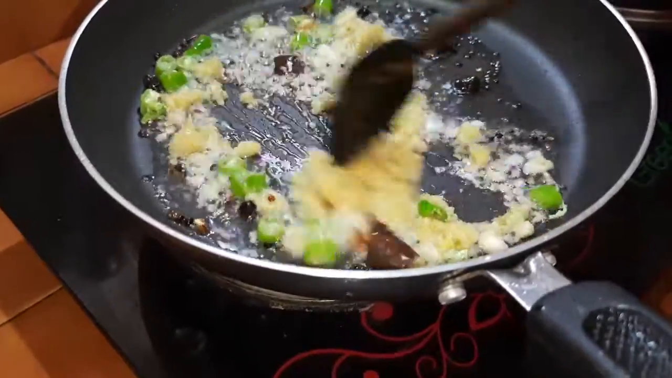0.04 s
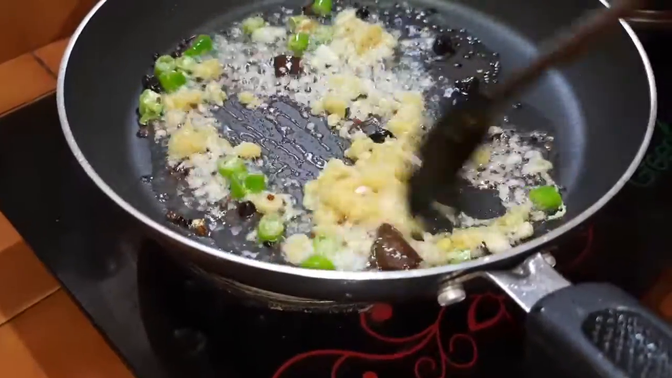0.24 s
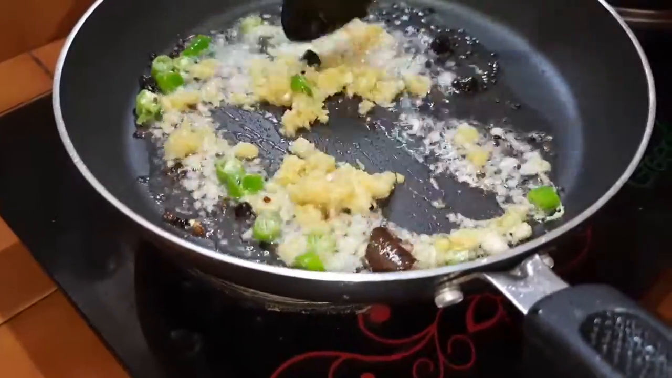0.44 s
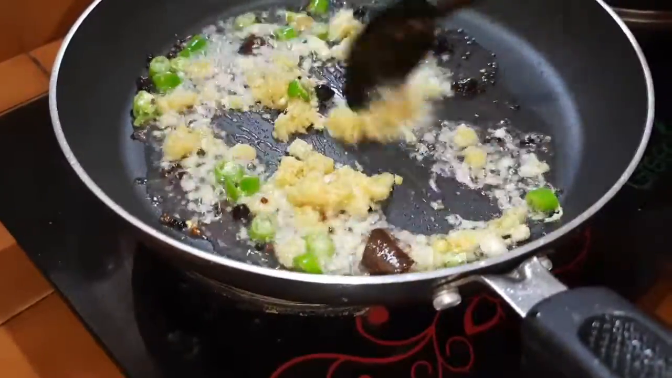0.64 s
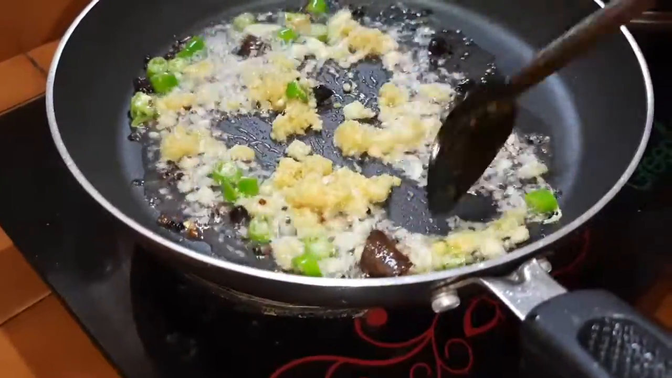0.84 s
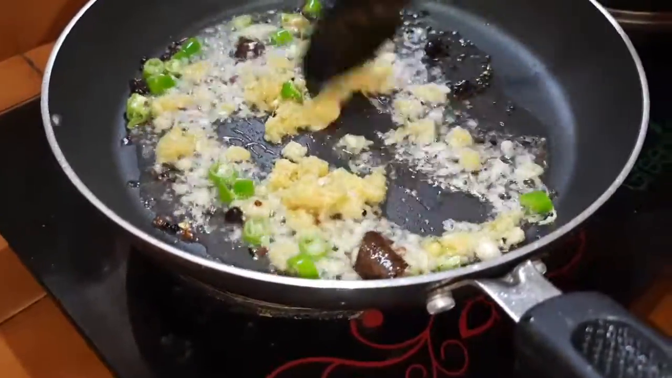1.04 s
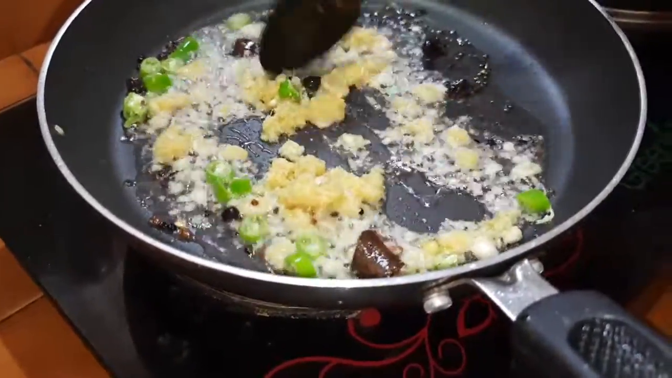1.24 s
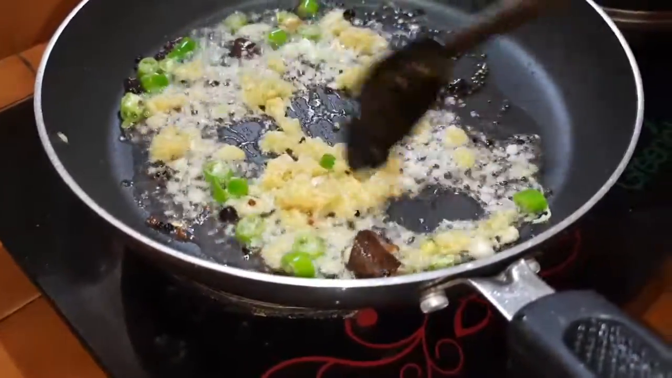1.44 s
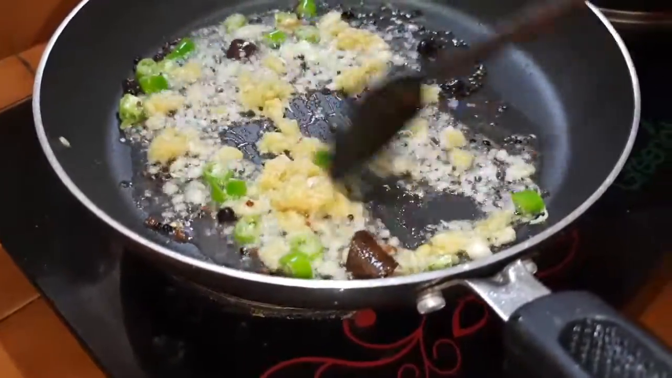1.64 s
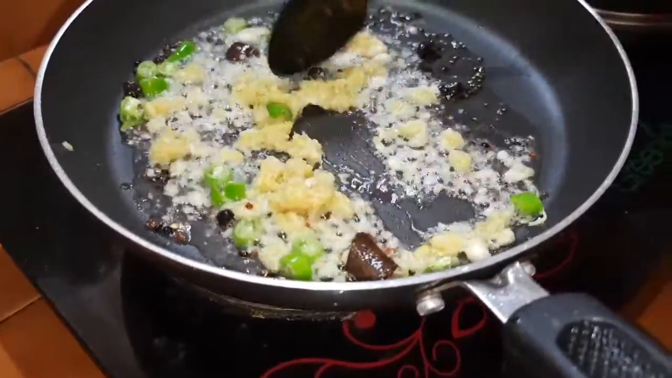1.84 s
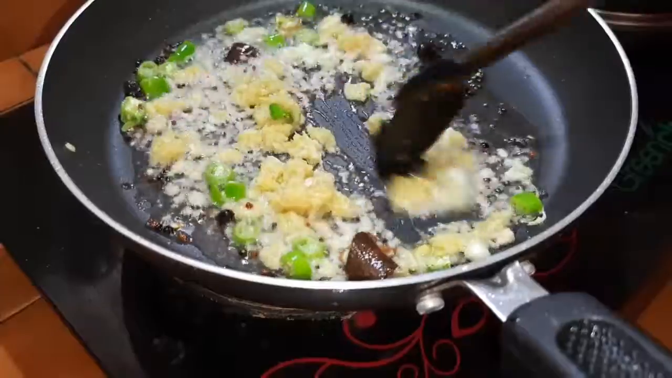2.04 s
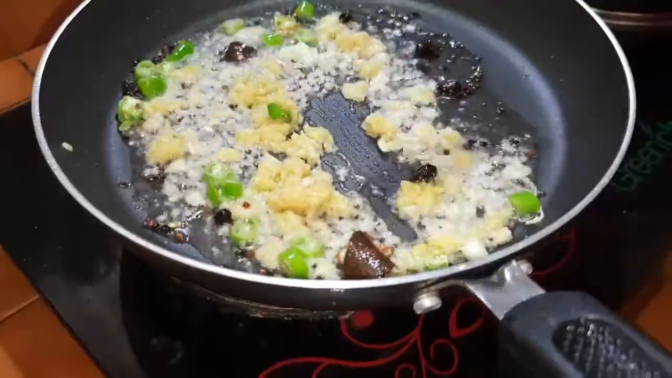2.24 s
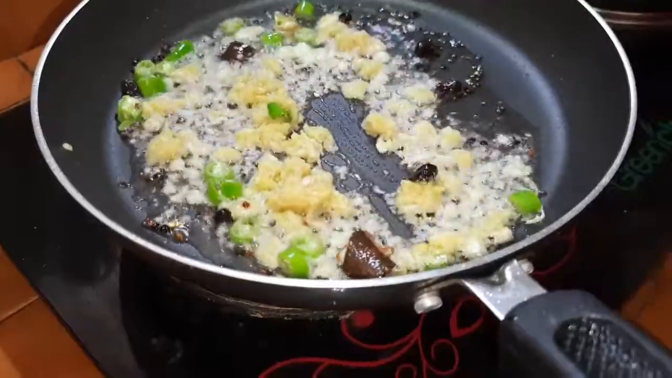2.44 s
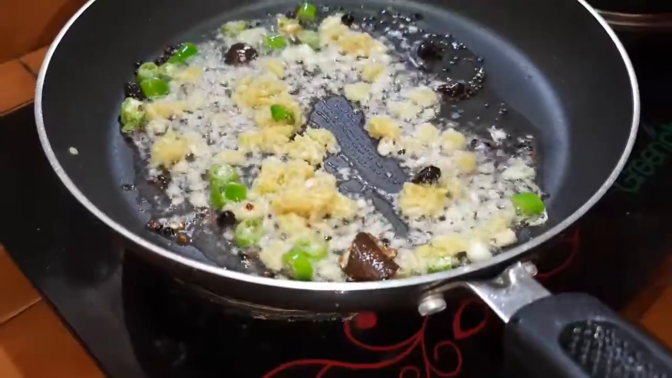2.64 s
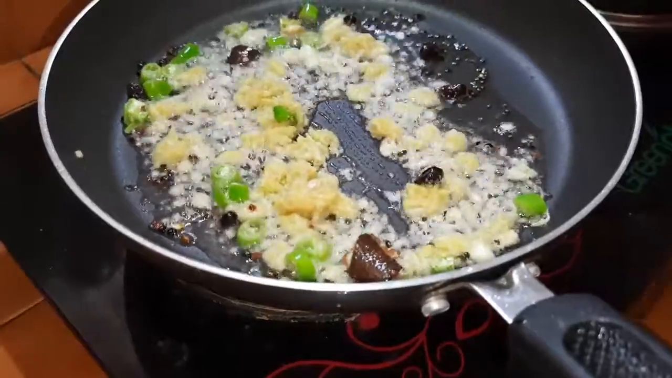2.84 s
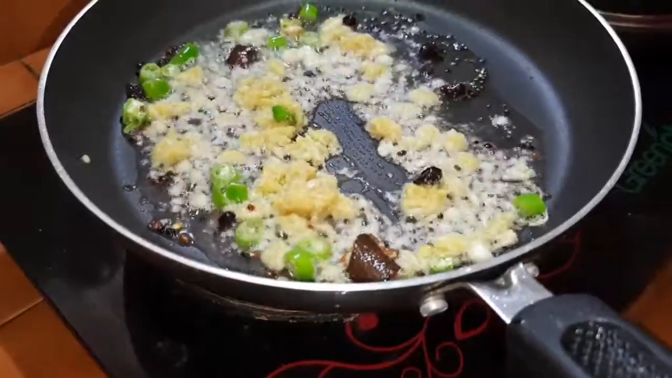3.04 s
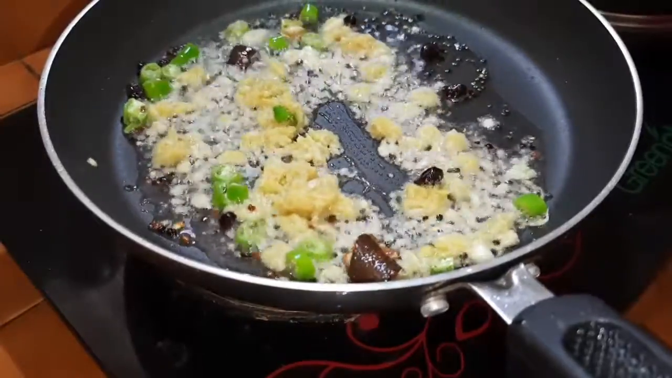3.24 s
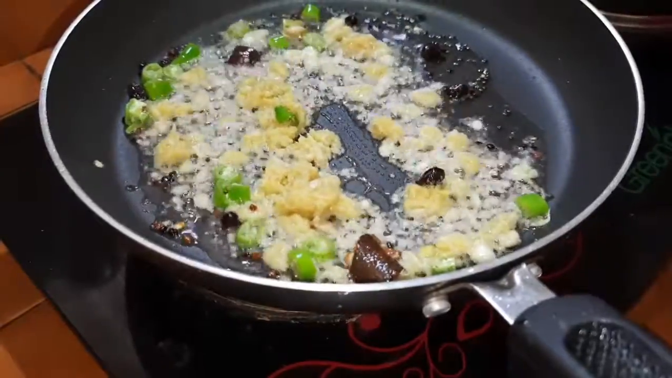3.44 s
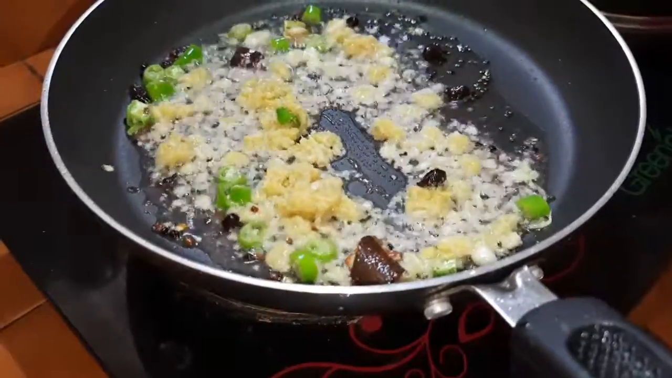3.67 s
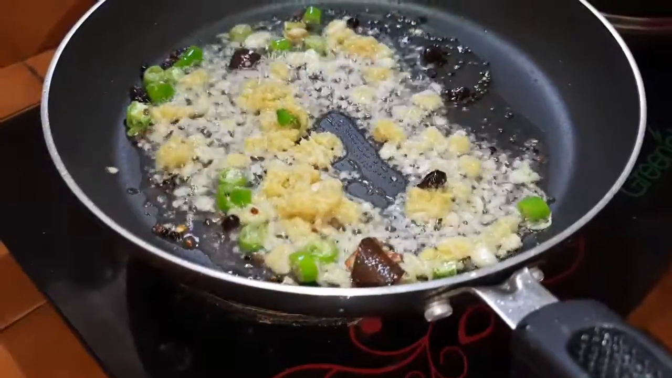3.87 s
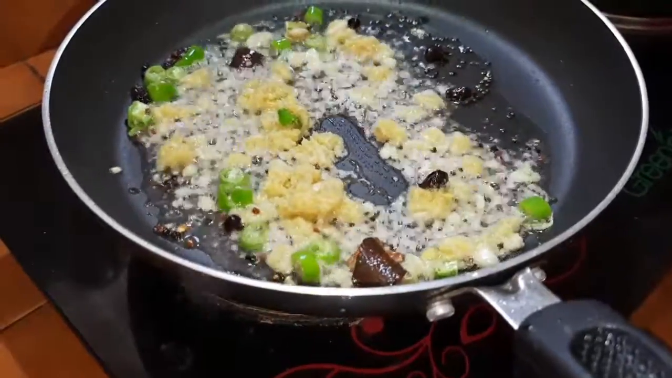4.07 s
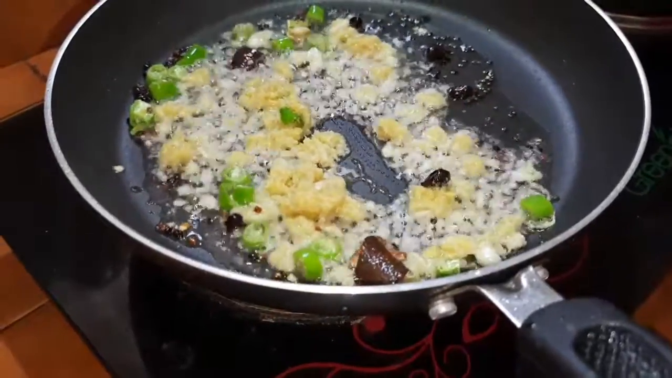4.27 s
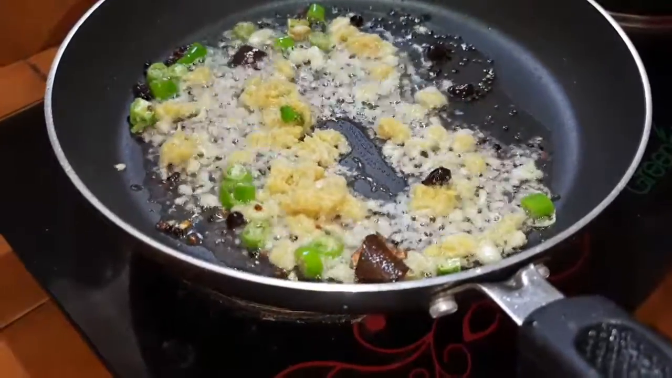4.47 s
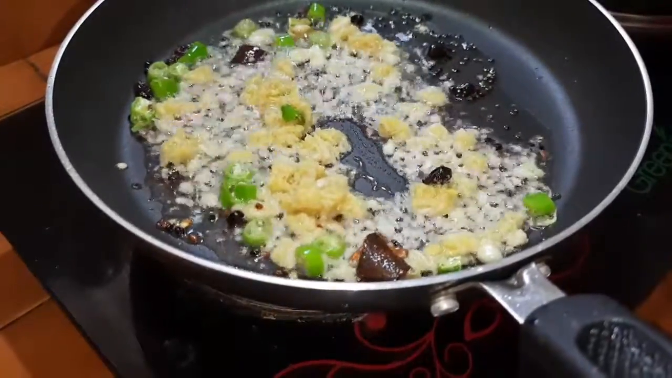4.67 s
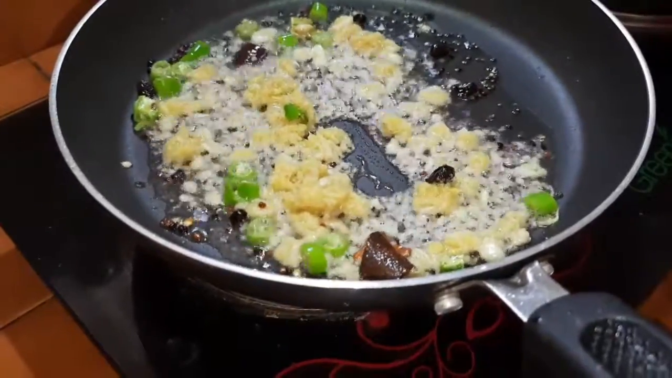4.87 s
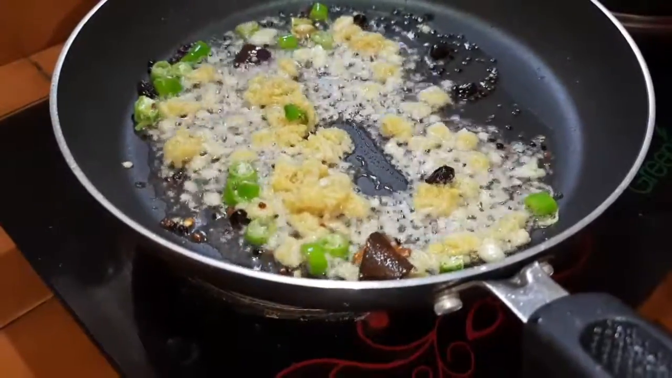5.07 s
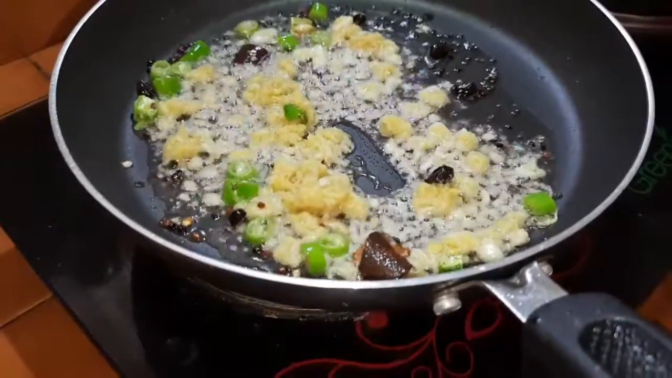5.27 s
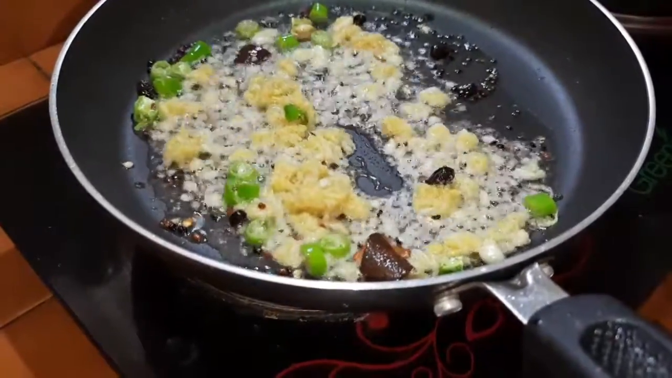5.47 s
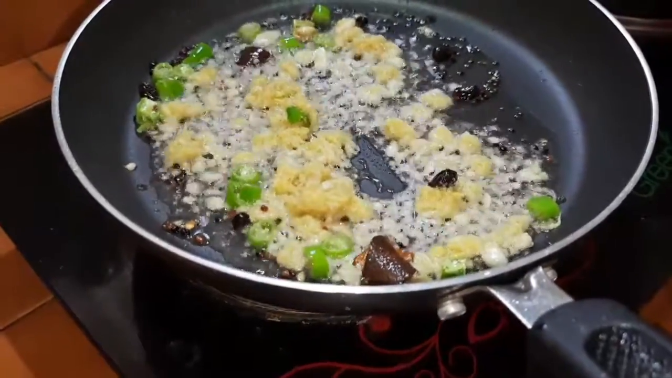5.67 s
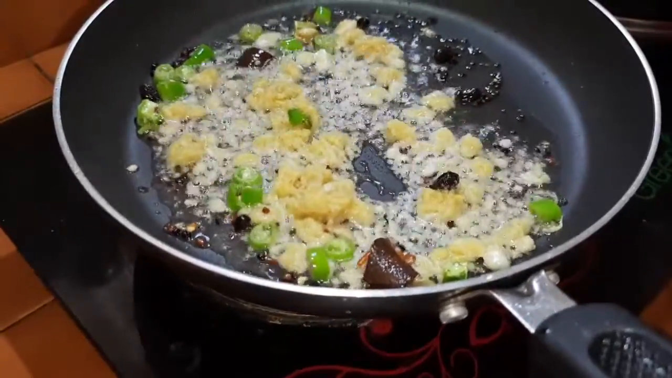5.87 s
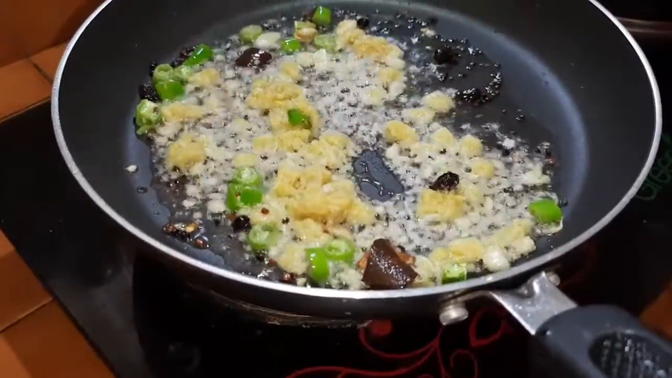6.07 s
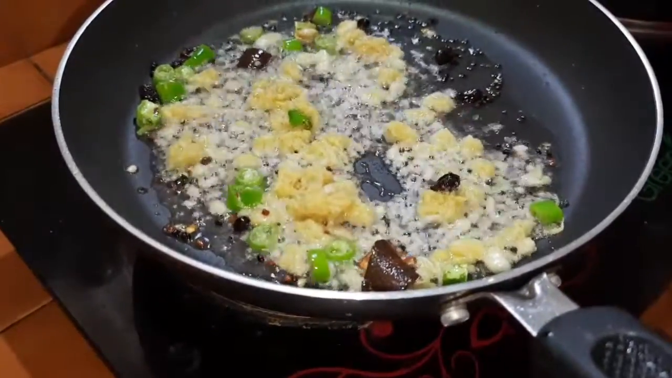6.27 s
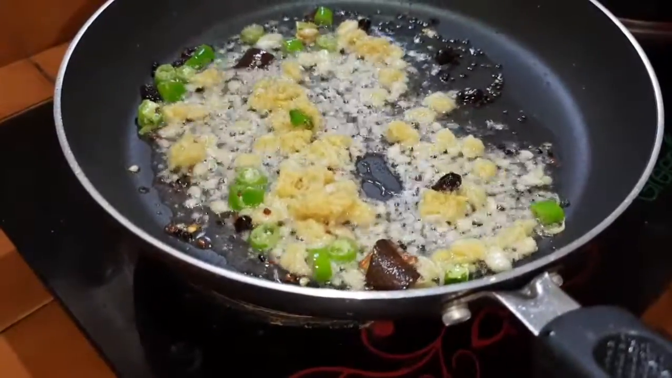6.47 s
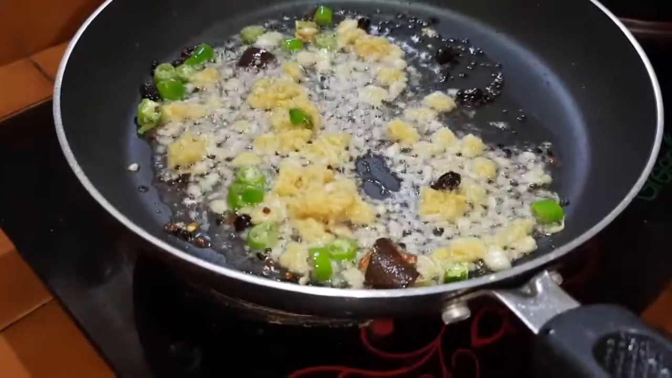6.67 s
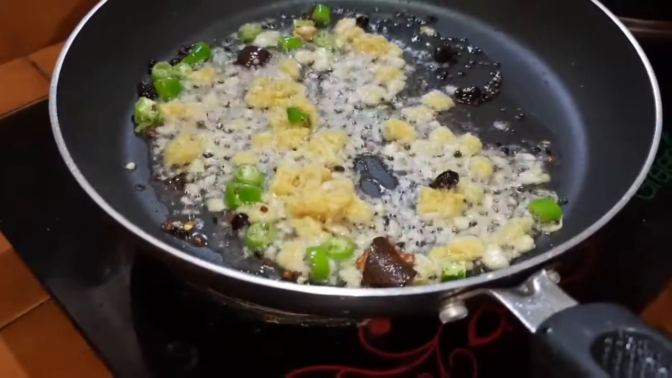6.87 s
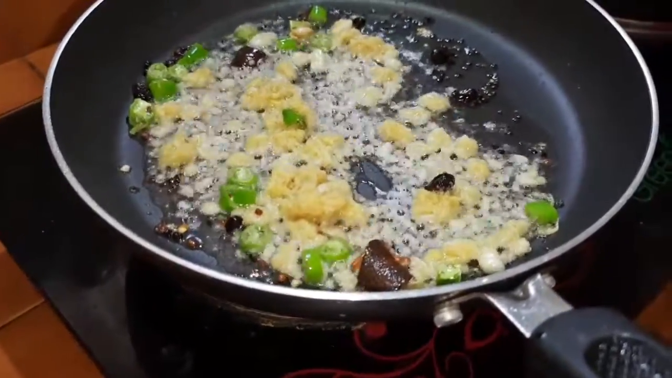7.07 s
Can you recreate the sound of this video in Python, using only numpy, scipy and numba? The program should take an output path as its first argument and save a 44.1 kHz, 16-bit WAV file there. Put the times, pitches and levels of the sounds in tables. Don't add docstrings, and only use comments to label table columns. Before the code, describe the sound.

Close, bright sizzle of ginger and spices in hot oil, snapping and popping, with four spatula taps and scrapes, then a rattling set-down.

```python
import sys
import numpy as np
from scipy import signal
from scipy.fft import rfft, irfft
from scipy.io import wavfile
from scipy.ndimage import uniform_filter1d
from numba import njit

SR = 44100
rng = np.random.default_rng(int(sys.argv[2]) if len(sys.argv) > 2 else 0)


def inscribe(sig):
    pcm = np.round(np.clip(np.atleast_2d(sig).T, -1, 1) * 32767)
    wavfile.write(sys.argv[1], SR, pcm.astype(np.int16))


def attenuation_scalar(level_db):
    decades = np.asarray(level_db, float) / 20
    return 10 ** decades


N = 313551


def level(x, db):
    return x * attenuation_scalar(db) / np.sqrt(np.mean(x ** 2))


def colour(x, points=((1, 0),), peaks=()):
    hz = np.maximum(np.arange(2049) * SR / 4096, 1)
    point_hz, point_db = np.array(points).T
    db = np.interp(np.log(hz), np.log(point_hz), point_db)
    db = db + sum(g * np.exp(-2 * ((hz - f) / w) ** 2) for f, w, g in peaks)
    cepstrum = irfft(np.log(attenuation_scalar(db)))
    causal = np.r_[cepstrum[0], 2 * cepstrum[1:2048], np.zeros(2048)]
    impulse = irfft(np.exp(rfft(causal)))
    return signal.fftconvolve(np.atleast_2d(x), impulse[None], axes=1)[:, :N]


def ring(x, hz, width):
    return signal.lfilter(*signal.iirpeak(hz, hz / width, fs=SR), x)


def walk(rate, count):
    k = max(int(1000 / rate), 1)
    held = np.repeat(rng.standard_normal((count, 7200 // k + 1)), k, axis=1)
    return 1.3 * uniform_filter1d(uniform_filter1d(held, k), k)[:, :7200]


def swells(s, rise, hold, fade):
    t = np.arange(0, N, 8) / SR
    rows = []
    for start, r, h, f in np.broadcast(s, rise, hold, fade):
        corners = np.cumsum([start, r, h, 60 / f])
        rows.append(np.interp(t, corners, [-10.5, 0, 0, -60], -200, -200))
    return np.repeat(attenuation_scalar(np.array(rows)), 8, axis=1)[:, :N]


def strokes(rows, rise, hold):
    s, db, bright_db, fade = np.transpose(rows)
    return [attenuation_scalar(db + k * bright_db) @ swells(s, rise[k], hold, fade) for k in range(2)]


def chatter(rate, scatter_db):
    u = rng.random((2, N))
    size = (1 - u[1]) ** (-scatter_db / 8.7)
    sign = np.sign(u[1] * 97 % 1 - .5)
    return (u[0] < rate / SR) * size * sign


def steady(x, span_s):
    power = uniform_filter1d(x ** 2, max(int(span_s * SR), 1))
    return x / np.sqrt(power + 0.28 * np.mean(x ** 2))


@njit
def bursts(at, hz, cycles, size, rise, glide, n):
    out = np.zeros(n + 4000)
    for k in range(len(at)):
        w = 2 * np.pi * hz[k] / SR
        span = cycles[k] * SR / hz[k]
        i = int(at[k])
        late = i + 1 - at[k]
        z = size[k] * np.exp((1j * w - 1 / span) * late)
        step = np.exp(1j * w - 1 / span)
        turn = np.exp(1j * w * glide / span)
        shut, fast = np.exp(-late / (rise * span)), np.exp(-1 / (rise * span))
        for j in range(min(int(4 * span) + 2, 3900)):
            out[i + 1 + j] += z.imag * (1 - shut)
            z, step, shut = z * step, step * turn, shut * fast
    return out[:n]


def two_ports(s, hz, cycles, size, lag_s, pan_db, rise, glide):
    ports = []
    for side in (.5, -.5):
        at = np.clip((s + side * lag_s) * SR, 0, N)
        ports.append(bursts(at, hz, cycles, size * attenuation_scalar(side * pan_db), rise, glide, N))
    return np.array(ports)


# (frequency [Hz], level [dB])
HUM_SPECTRUM = [(25, -16), (45, -1.5), (65, -1.5), (115, -1), (170, -4), (260, -3), (400, -2.5), (800, -11),
                (2000, -20.5)]


def kitchen():
    both, left, right = colour(rng.standard_normal((3, N)), HUM_SPECTRUM)
    drift = np.interp(np.arange(N) / SR, np.arange(7200) / 1000, walk(7.7, count=1)[0])
    near = colour(left, [(30, 5.2), (70, 6.9), (200, 4.5), (500, 2.5)])[0]
    hum = np.array([near + 0.99 * both, 0.79 * right + 0.48 * both])
    return level(hum, -53.29) * attenuation_scalar(0.41 * drift)


def room(x, t60, db):
    t = np.arange(SR // 2) / SR
    tail = rng.standard_normal((2, len(t))) * 1000 ** (-t / t60) * (t > .003)
    return signal.fftconvolve(x, attenuation_scalar(db) * tail / np.sqrt(np.sum(tail[0] ** 2)), axes=1)[:, :N]


# (time [s], hold [s], level near 145 Hz [dB], near 240 Hz [dB], near 400 Hz [dB])
HOB_JOLTS = [
    (.99, 0.03, -43, -38, -44),
    (1.367, .02, -52, -68, -64),
    (1.678, .03, -42.5, -54, -47),
    (1.95, 0.02, -39.5, -51, -50),
    (3.273, 0.075, -42, -35, -45),
    (3.508, .01, -41.5, -43, -48),
    (3.67, 0.089, -67, -60, -46.5),
]
# (frequency [Hz], width [Hz])
GLASS_MODES = [(143, 25), (240, 33), (390, 130)]


def hob():
    s, hold, *modes_db = np.transpose(HOB_JOLTS)
    gains = attenuation_scalar(np.array(modes_db)) @ swells(s, 0.024, hold, 226)
    shudder = 0
    for gain, (hz, width) in zip(gains, GLASS_MODES):
        mode = ring(ring(chatter(2500, scatter_db=2.0), hz, width), hz, 2 * width)
        shudder = shudder + steady(mode, 0.71 / width) * gain
    return shudder


# (time [s], level [dB], brightness [dB], fade [dB/s])
LAYING_DOWN = [
    (3.281, -25.5, 6, 178),
    (3.469, -34, -3, 126),
]
# (frequency [Hz], width [Hz], level [dB])
SPATULA_LOW = [(1217, 48, 3), (1310, 55, 3), (1460, 82, -7), (1580, 66, -3)]
# (frequency [Hz], width [Hz], level [dB])
SPATULA_HIGH = [(1760, 140, -2), (1940, 53, -1), (2120, 81, 5), (2340, 90, -8), (2420, 150, 5),
                (2600, 180, 0), (2940, 150, -21), (5050, 1400, -13)]


def rattle():
    clicks = chatter(2200, scatter_db=1.0)
    gains = strokes(LAYING_DOWN, rise=(0.053, 0.061), hold=0.029)
    sound = 0
    for modes, gain in zip((SPATULA_LOW, SPATULA_HIGH), gains):
        ringing = sum(attenuation_scalar(g) * ring(clicks, f, w) for f, w, g in modes)
        sound = sound + steady(ringing, 0.014) * gain
    return np.array([np.roll(sound, -5), sound])


# (frequency [Hz], level [dB], t60 [s])
PAN_MODES = [(534, -21, 0.28), (628, -3, 0.19), (664, -0.5, 0.13), (772, -4, 0.095), (865, -8, 0.18),
             (967, -2.5, 0.11), (1023, -1.5, 0.18), (1170, -4, 0.11), (1285, -6, 0.11), (1450, 2, 0.063),
             (1846, 3, 0.12), (1950, 3, 0.085), (2080, 2, 0.084), (2290, 2, 0.16), (2530, 4, 0.059),
             (2960, -22, .08)]
# (time [s], level [dB], brightness [dB], fade [dB/s])
BLADE_DRAG = [
    (.98, -28.5, 6.5, 350),
    (1.03, -36, 9.5, 148),
    (1.37, -33.5, -1, 68),
    (1.675, -26.5, 5, 250),
    (1.965, -28, -11, 126),
]


def drag():
    clicks = chatter(2200, scatter_db=1.0)
    gains = strokes(BLADE_DRAG, rise=(0.022, 0.0021), hold=0.0035)
    sound = 0
    for modes, gain in zip((PAN_MODES[:7], PAN_MODES[7:]), gains):
        ringing = sum(attenuation_scalar(g) * ring(clicks, f, 10.0 / t60) for f, g, t60 in modes)
        sound = sound + level(ringing, -2.7) * gain
    return np.array([sound, np.roll(sound, 4)])


# (time [s], peak level [dB], push [ms])
HOB_KNOCKS = [
    (1.037, -31.5, 5.),
    (1.1698, -17.5, 0.37),
    (3.317, -34, 2.9),
]


def thumps():
    t = np.arange(N) / SR
    return sum(attenuation_scalar(g) * np.sin(np.pi * np.clip((t - at) * 1000 / ms, 0, 1)) for at, g, ms in HOB_KNOCKS)


# (time [s], peak level [dB], knock [Hz],
# ring of the pan [dB], left minus right [dB])
SPATULA_TAPS = [(0.85, -28, 2320, -8, -4), (0.971, -8, 1000, -4, -2), (0.985, -18, 1000, -5, 7),
                (1.0308, -10.5, 1100, -15, -14), (1.0307, -11, 2480, -8, 8), (1.0313, -5, 5070, -9, -7),
                (1.047, -27, 2100, 3, -4), (1.26, -30, 2100, -9, 1), (1.3598, -14, 830, 4, 2),
                (1.6702, -18, 1310, 2, -6), (1.683, -25.5, 1900, -3, 0), (1.691, -23, 2210, -4, -7),
                (1.899, -27, 2700, -6, -4), (1.9508, -11.5, 676, 4, 0.5), (1.9510, -17, 1010, -4, 7)]
# (time [s], peak level [dB], knock [Hz], left minus right [dB])
SPATULA_BOUNCES = [
    (3.296, -15, 930, 2),
    (3.314, -13, 1570, 4),
    (3.3165, -19, 685, -3),
    (3.3345, -12, 2300, 3),
    (3.342, -19, 1620, -7),
    (3.353, -15, 2360, 0),
    (3.378, -21, 1260, -6),
]


def taps():
    bounces = [(at, g, f, -5.5, p) for at, g, f, p in SPATULA_BOUNCES]
    s, db, hz, ring_db, pan_db = np.transpose(list(SPATULA_TAPS) + bounces)
    contact_ms = np.repeat([0.71, 1.36], [len(SPATULA_TAPS), len(SPATULA_BOUNCES)])
    cycles = hz * contact_ms / 1000
    knock = two_ports(s, hz, cycles, attenuation_scalar(db + 2.0), 0 * s, pan_db, 0.69, -0.012)
    push = two_ports(s, hz, cycles, attenuation_scalar(db + 2.0 + ring_db), 0 * s, pan_db, 0.69, -0.012)
    ringing = sum(attenuation_scalar(g) * ring(push, f, 2.8 / t60) for f, g, t60 in PAN_MODES)
    no_bass = signal.butter(3, 380., "high", fs=SR, output="sos")
    return signal.sosfilt(no_bass, knock + attenuation_scalar(16.5) * ringing)


# (time [s], peak level [dB], left minus right [dB])
OIL_SPITS = [(0.277, -10, 11), (0.2921, -3, 9), (0.5641, -9, 6), (0.5766, -1, -2), (0.7283, -7, -1),
             (1.171, -8, 7), (1.227, -5, 3), (1.232, -6, 7), (2.3587, -3, 12), (2.3717, -7, 7),
             (2.581, -4, 1), (2.7254, -1, -1), (2.7827, -9, -1), (3.033, -11, 2), (3.8441, -10, 9),
             (3.952, -12, 7), (4.0469, -6, 4), (4.8562, -10, 7), (5.9199, -12, 8), (6.3689, -12, 10),
             (6.3858, -10, 3), (6.5448, -9, 0), (6.8776, -12, 0)]


def spits():
    s, db, pan_db = np.transpose(OIL_SPITS)
    lag = 0.064 * rng.standard_normal(len(s)) / 1000
    hz, cycles = np.full(len(s), 10700.0), np.full(len(s), 0.5)
    clicks = two_ports(s - .0001, hz, cycles, attenuation_scalar(db + 14.0), lag, pan_db - 1.0, 0.36, -.02)
    return colour(clicks, [(300, -27), (3000, -5.5)])


# (time [s], peak level [dB], pitch [Hz], left minus right [dB])
RINGING_BUBBLES = [(0.3122, -9, 6970, -1.5), (0.5594, -11, 6940, 3), (0.7274, -19, 6580, 0.0),
                   (1.2436, -9, 5940, -2.0), (1.5514, -19, 6520, 0.0), (1.619, -18, 3870, -1.5),
                   (2.5804, -16, 6730, 4), (2.6559, -16, 6870, -1.0), (2.7254, -18, 5190, -3),
                   (2.7815, -16, 4000, 0.0), (3.1374, -16, 4710, -4), (3.189, -11.5, 4080, 6),
                   (3.3774, -11, 5050, -0.5), (3.421, -11.5, 4060, 1), (3.613, -10, 4130, -2),
                   (3.6895, -11, 5620, 0.5), (3.9659, -18, 5270, -1.5), (5.9184, -26, 4680, -3),
                   (6.652, -13, 4750, -2), (6.972, -18.5, 4370, 3)]
# (time [s], peak level [dB], pitch [Hz], left minus right [dB])
LOW_BUBBLES = [
    (1.5683, -19, 2220, -1.5),
    (4.8539, -23.5, 2170, 0.5),
    (5.15, -23, 2350, 5),
    (5.4504, -33, 3060, -0.5),
    (5.9314, -22.5, 2900, -3),
    (6.0054, -28, 2380, 3),
    (6.543, -25, 2180, 0.5),
]
# (time [s], peak level [dB], pitch [Hz], left minus right [dB])
WATER_CRACKS = [(0.016, -11, 8680, -12), (0.4054, -8, 9820, -3), (0.431, 1, 12300, 1),
                (1.0311, -5, 9380, -1), (1.1444, -6, 9200, 3.0), (1.3244, -8, 9010, -4),
                (1.742, -1, 9220, -1), (2.6579, -8, 12200, 8), (3.314, -11, 8420, -13),
                (4.5135, -2, 12100, 1), (4.6872, -8, 12100, -4), (6.4278, -6, 8750, -2),
                (6.4734, -15, 12400, 2.0), (7.0224, -7, 12200, 4.5)]


def pops():
    kinds = (RINGING_BUBBLES, LOW_BUBBLES, WATER_CRACKS)
    s, db, hz, pan_db = np.transpose([row for kind in kinds for row in kind])
    cycles = np.repeat([4.6, 3, 2.2], [len(kind) for kind in kinds])
    lag = 0.049 * rng.standard_normal(len(s)) / 1000
    sound = two_ports(s + 0.0011, hz, 0.61 * cycles, attenuation_scalar(db + 6.0), lag, pan_db, 0.24, -0.018)
    sound = sound + spits()
    return sound + room(sound, .015, -9)


# (time [s], sizzle level [dB])
FRYING = [(0.0, -20), (0.06, -20), (0.38, -22), (0.44, -19), (0.47, -20.5), (0.69, -19.5), (0.99, -21.5),
          (1.03, -19), (1.13, -20), (1.72, -23), (1.74, -19.5), (1.76, -20.5), (2.06, -23), (3.28, -24),
          (3.32, -21), (3.48, -24.5), (4.89, -27), (7.11, -27.5)]


def froth(count, cycles, scatter_db, patchy_db, flicker_db, spread_ms):
    u, g = rng.random((count, 4)).T, rng.standard_normal((count, 2)).T
    s, hz = u[0] * N / SR, 250 * 70 ** u[1] ** 0.5966
    flare = patchy_db * (walk(9, count=1) + 0.55 * walk(6, count=8)) + flicker_db * walk(60, count=8)
    flare_db = flare[(u[1] * 8).astype(int), (s * 1000).astype(int)]
    heat_db = np.interp(s, *np.transpose(FRYING)) + 24
    deep_db = -0.1739 * heat_db * np.clip(np.log2(5000 / hz), 0, 2)
    size_db = -scatter_db * np.log(1 - .995 * u[2]) + flare_db + deep_db
    size = attenuation_scalar(size_db) * (hz / 5000) ** 0.82
    return two_ports(s, hz, cycles * (.5 + u[3]), size, spread_ms * g[0] / 1000, 4.9 * g[1], 0.31, -0.011)


# (frequency [Hz], level [dB])
BOWL_SPECTRUM = [(150, -32), (500, -13.5), (900, -13.5), (2000, -9), (3400, -4), (4000, -1), (5000, 0),
                 (8000, 2), (14000, -1), (15400, 1.5)]
# (frequency [Hz], width [Hz], level [dB])
BOWL_RESONANCES = [(966, 380, 5.5), (1383, 212, 8.5), (2104, 710, 6), (2900, 90, 7), (2850, 44, -9.5),
                   (3650, 320, -2.5)]


def sizzle():
    fizz = froth(count=220000, cycles=1.17, scatter_db=0.73, patchy_db=0.54, flicker_db=1.05, spread_ms=0.195)
    crackle = froth(count=9000, cycles=0.54, scatter_db=1.4, patchy_db=-0.5, flicker_db=2.4, spread_ms=0.203)
    crackle = colour(crackle, [(150, -20.5), (1500, -6.0)])
    steam = colour(rng.standard_normal((2, N)), [(300, -12.5), (1500, 0.5), (5000, 7.5), (12000, 7.5)])
    mix = level(fizz, 0) + level(crackle, -8.5) + level(steam, -1.3)
    bed = level(colour(mix, BOWL_SPECTRUM, BOWL_RESONANCES), 3.19)
    return bed * attenuation_scalar(np.interp(np.arange(N) / SR, *np.transpose(FRYING)))


def scene():
    knocks = hob() + rattle() + drag() + thumps() + taps()
    echoes = room(knocks, .22, -8)
    return kitchen() + knocks + echoes + pops() + sizzle()


def band_limit(x):
    return signal.sosfilt(signal.butter(12, 16770, fs=SR, output="sos"), x)


# (frequency [Hz], width [Hz], level [dB])
LEFT_RESONANCES = [(6070, 380, -2), (7620, 1160, -4.5), (8600, 330, 3), (9200, 1420, 6.5), (10350, 370, 3),
                   (12430, 1800, 7)]
# (frequency [Hz], width [Hz], level [dB])
RIGHT_RESONANCES = [(6200, 1500, 0.56), (10700, 3000, -2), (12100, 600, 3.5), (13500, 870, 2)]


def record(dry):
    ports = np.vstack([colour(dry[0], peaks=LEFT_RESONANCES), colour(dry[1], peaks=RIGHT_RESONANCES)])
    top_cut = signal.ellip(12, .2, 90, 15480, fs=SR, output="sos")
    bass_cut = signal.butter(1, 30, "high", fs=SR, output="sos")
    mix = signal.sosfilt(np.vstack([top_cut, bass_cut]), np.clip(ports, -1, 1))
    return band_limit(mix)


dry = scene()
out = record(dry)
inscribe(out)
```